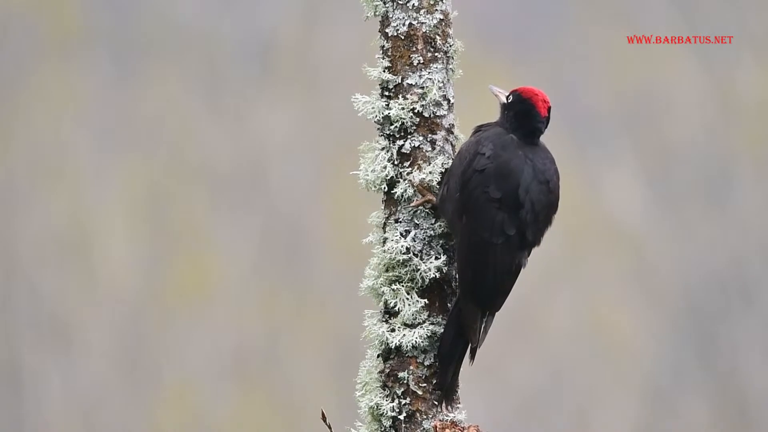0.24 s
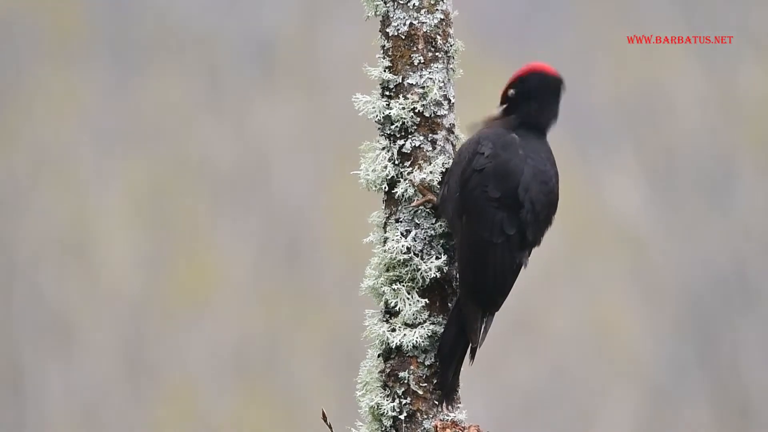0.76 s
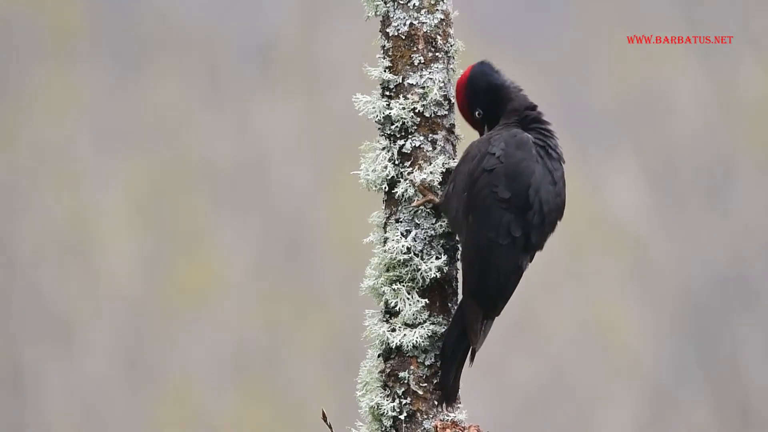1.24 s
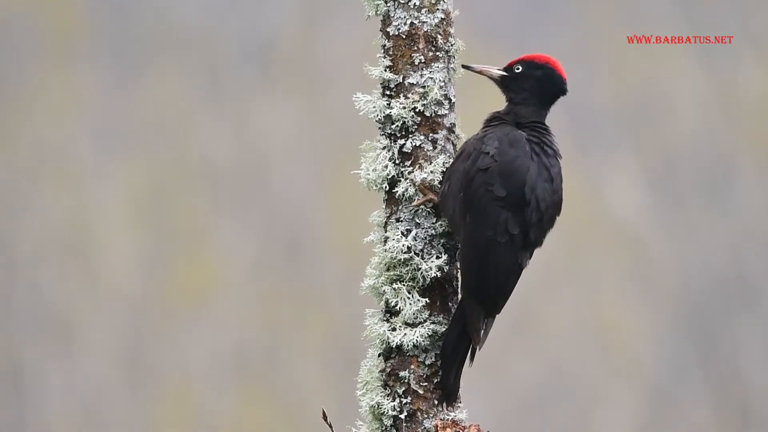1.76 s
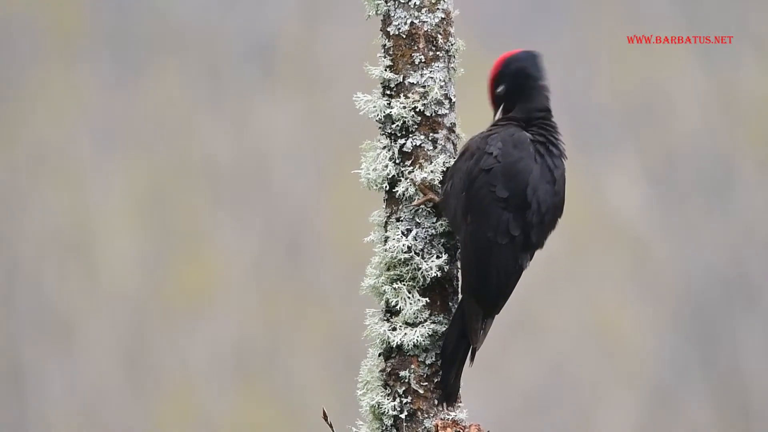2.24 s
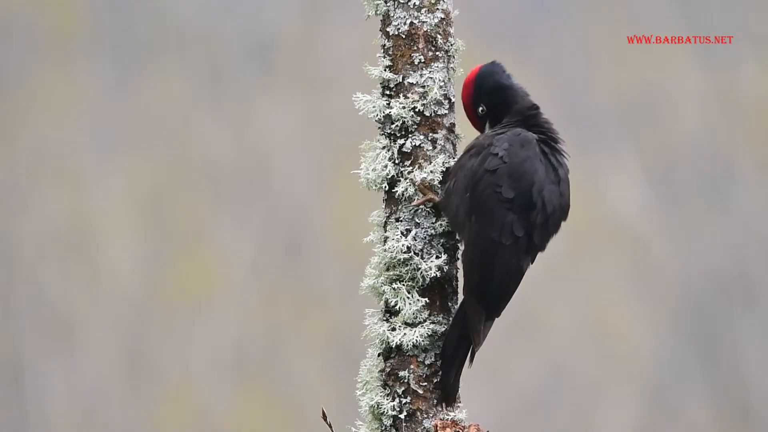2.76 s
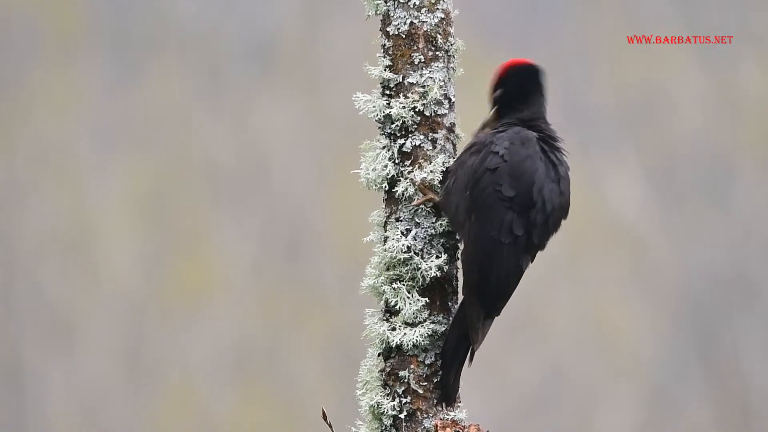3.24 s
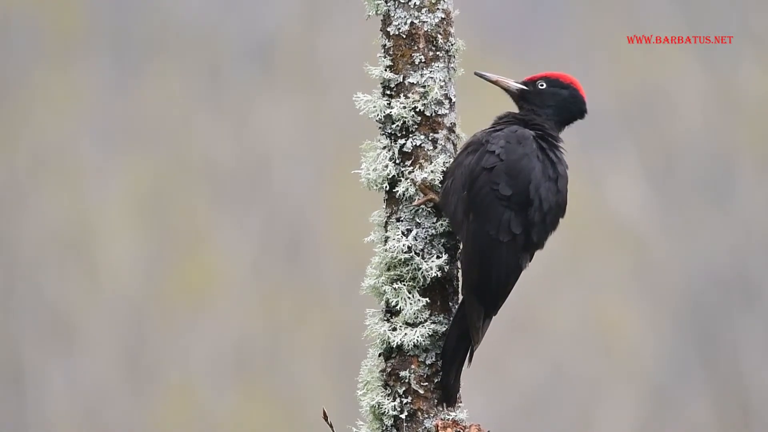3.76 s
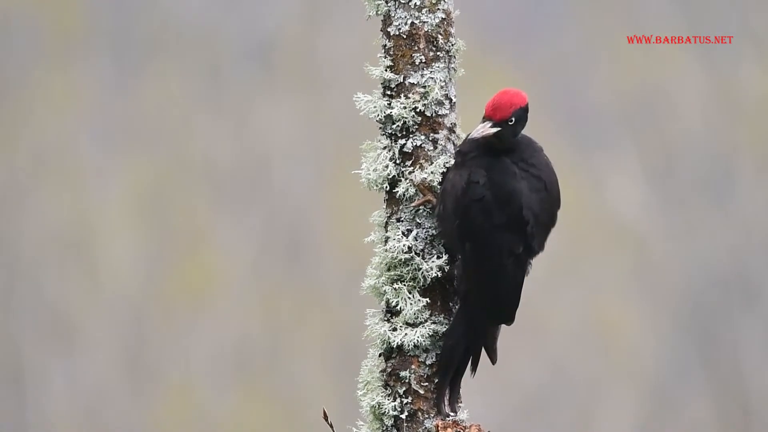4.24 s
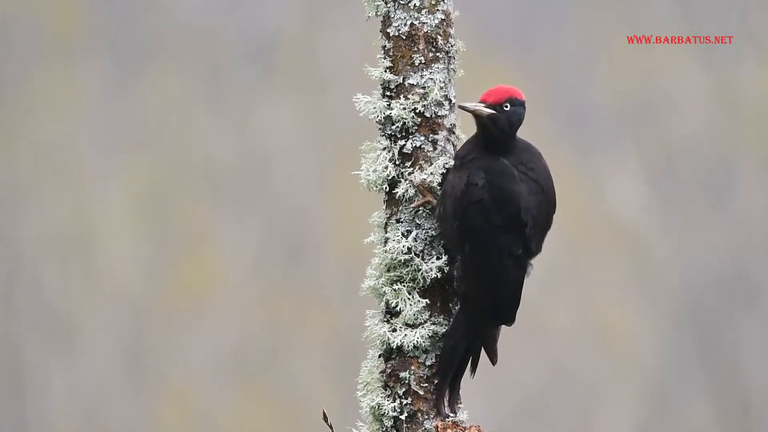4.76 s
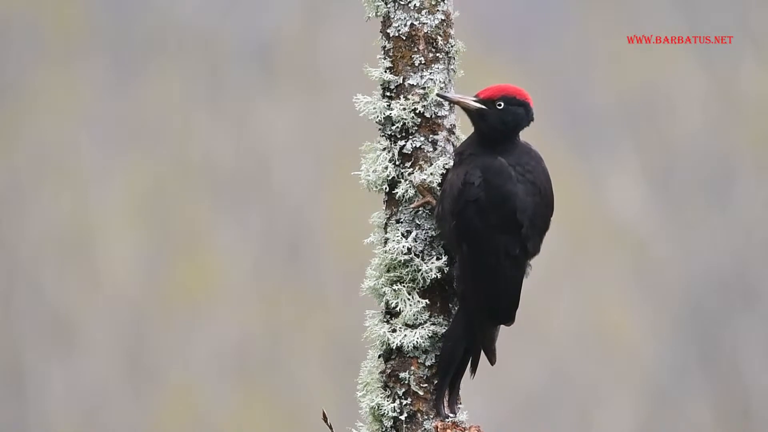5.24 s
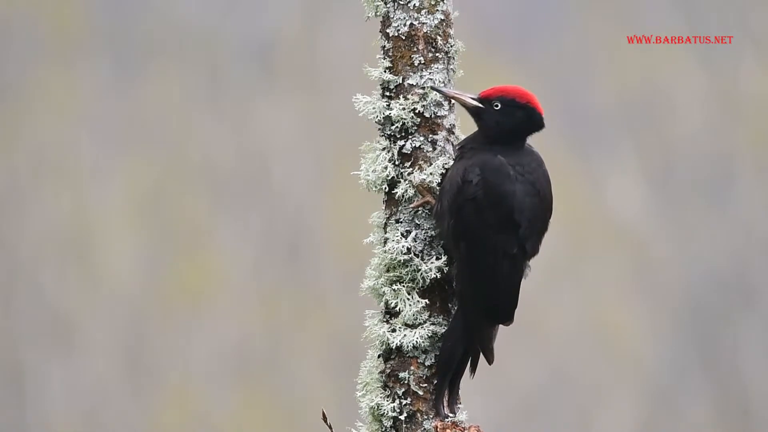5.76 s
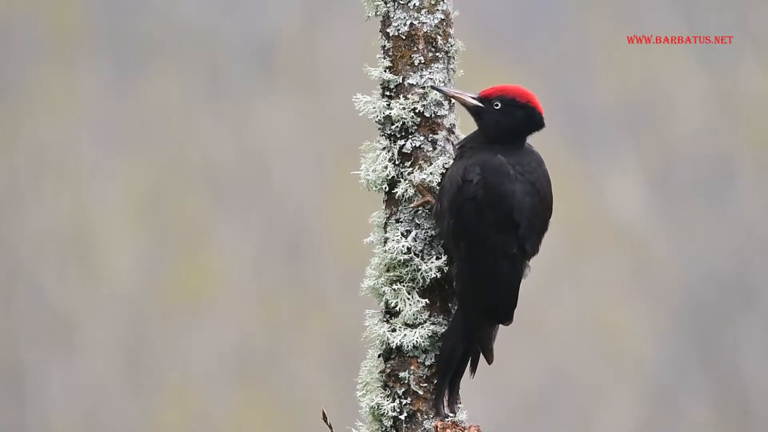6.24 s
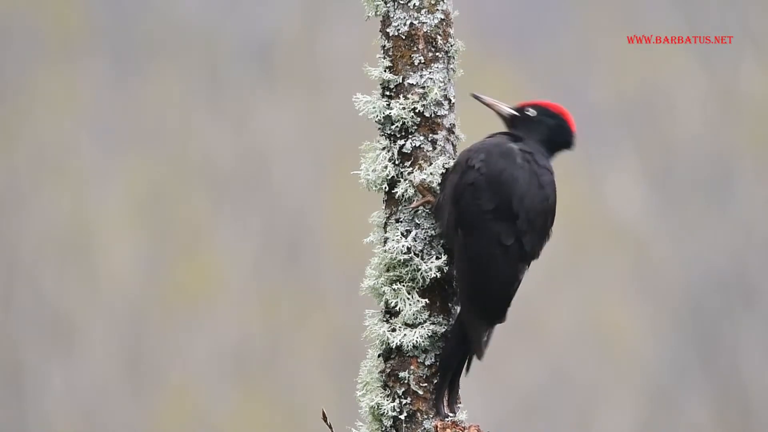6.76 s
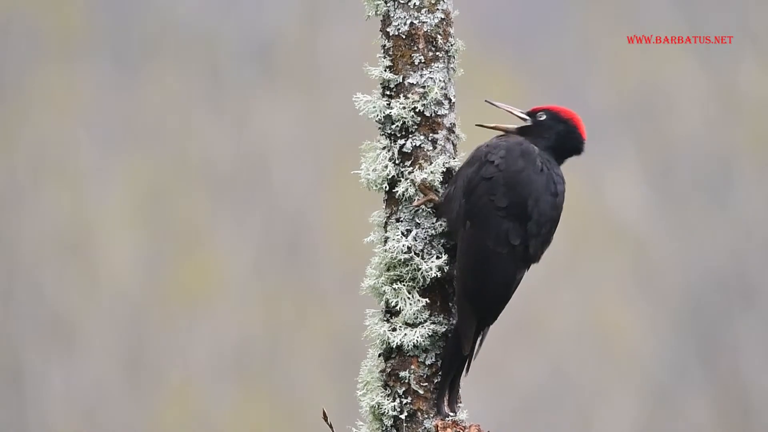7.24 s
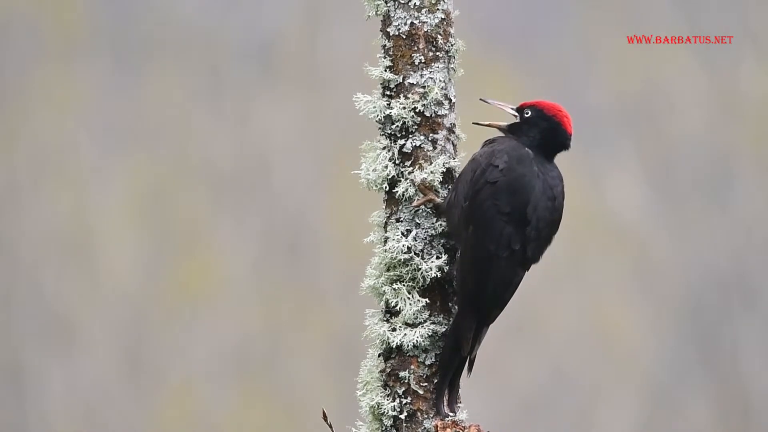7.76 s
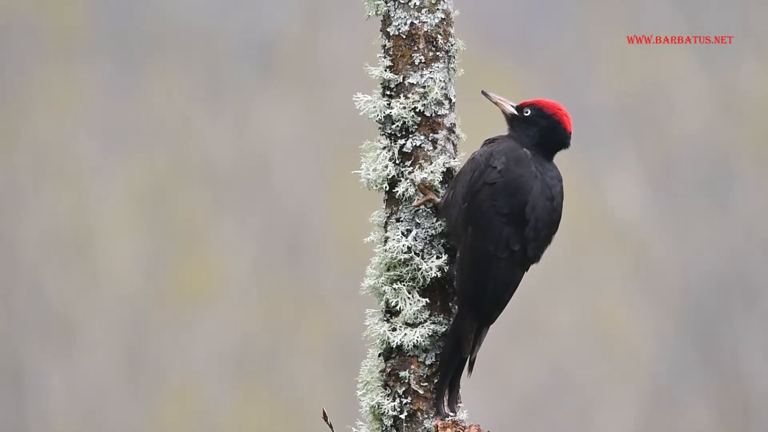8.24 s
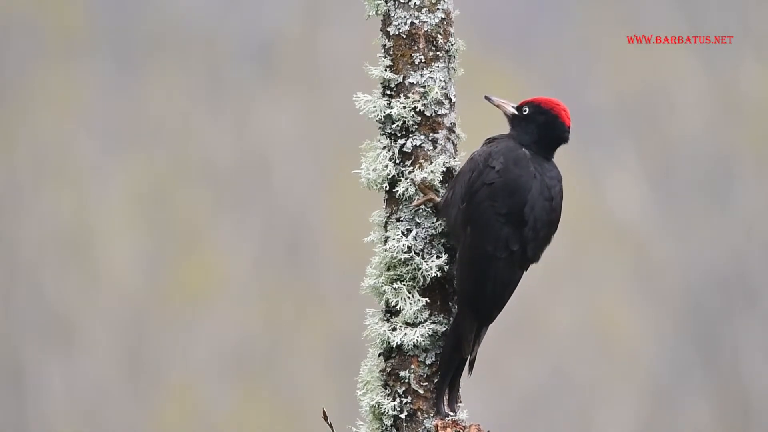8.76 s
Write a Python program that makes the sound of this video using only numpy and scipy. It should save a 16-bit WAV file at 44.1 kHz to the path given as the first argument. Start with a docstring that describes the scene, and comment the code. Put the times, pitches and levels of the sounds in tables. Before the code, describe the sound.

Over a faint, distant rush like wind or water, a woodpecker lets out one drawn-out whistling call that falls away and echoes among the trees. A short gap follows, then the same bird delivers nearly thirty loud, evenly spaced ringing notes, each sliding upward with a slight rasp. The microphone picks it up clearly, with forest echo trailing behind. A very faint, high, distant bird comes at the end.

```python
"""A mountain forest: a large woodpecker on a trunk gives one drawn-out falling call, then a long fast
series of ringing notes, each an upward slur that snaps onto a held pitch. The voice is a harmonic stack
with a faint rasp. Trees scatter a long echo with a late, dull tail, over a far rush of air or water; a
faint, high distant bird comes at the end. The recorder adds faint mains hum and hiss and bends a little
on loud notes."""
import sys
import numpy as np
from scipy import signal
from scipy.fft import rfft, irfft, next_fast_len
from scipy.io import wavfile
from scipy.ndimage import uniform_filter1d, map_coordinates

SR = 44100
rng = np.random.default_rng(int(sys.argv[2]) if len(sys.argv) > 2 else 0)


def int16_out(signal):
    """Quantize to a 16-bit WAV file."""
    q = np.round(np.clip(np.atleast_2d(signal).T, -1, 1) * 32767)
    wavfile.write(sys.argv[1], SR, q.astype(np.int16))


N = 396900


def amp(db):
    return 10 ** (np.asarray(db) / 20)


def unit_rms(x):
    return x / np.sqrt(np.mean(x ** 2) + 1e-20)


def log_interp(points, hz):
    """Interpolate (Hz, value) points on a log frequency axis."""
    point_hz, values = np.transpose(points)
    return np.interp(np.log(hz + 1), np.log(point_hz + 1), values)


def wobble(knots_per_s):
    """Smooth random curve."""
    knots = rng.standard_normal(int(N * knots_per_s / SR) + 4)
    return map_coordinates(knots, [np.arange(N) * knots_per_s / SR])


def filtered(x, response):
    """Zero-phase filter with gain response(hz)."""
    size = next_fast_len(N + SR // 2)
    return irfft(rfft(x, size) * response(np.fft.rfftfreq(size, 1 / SR)), size)[:N]


def noise(spectrum):
    """Unit-rms noise. Each spectrum row: frequency in Hz, relative density in dB."""
    return unit_rms(filtered(rng.standard_normal(N), lambda hz: amp(log_interp(spectrum, hz))))


def background():
    """Far rush of air or water, a faint high bird at the end; recorder hiss, rumble, hum and bumps."""
    # Each row: frequency in Hz, relative density in dB.
    rush_spectrum = [(400, -38), (700, -25), (850, -14), (1000, -4), (1500, -2), (1750, -5), (2100, 0),
                     (2600, -5), (3500, -15), (5200, -27), (7000, -38), (9000, -70)]
    hiss_spectrum = [(20, 4), (32, 4), (45, -2), (70, -10), (200, -20), (600, -25.5), (5000, -31),
                     (15000, -30)]
    bump_spectrum = [(20, -6), (60, 0), (130, -3), (250, -14), (500, -35), (1200, -80)]
    distant_bird_spectrum = [(2500, -40), (3600, -3), (4200, 0), (4800, -4), (6000, -40)]
    # Each row: frequency in Hz, rms level in dB.
    hum_lines = [(100, -85), (200, -98), (300, -97)]
    # Each row: start in seconds, level in dB before a 12 dB lift.
    bump_hits = [(1.45, -72), (1.535, -65), (3.56, -70), (3.98, -75), (4.72, -75), (4.89, -75)]
    # Each row: time in seconds, level in dB.
    distant_bird_levels = [(8.75, -95), (8.82, -76), (8.9, -73), (9.0, -75)]
    t = np.arange(N) / SR
    rush = amp(-62 + .5 * wobble(2)) * noise(rush_spectrum)
    hum = sum(amp(db + 3 + 2.5 * wobble(.8)) * np.sin(2 * np.pi * hz * t) for hz, db in hum_lines)
    bump_envelope = np.zeros(N)
    for start_s, db in bump_hits:
        age_s = np.maximum(t - start_s, 0)
        bump_envelope += amp(db + 12 - 60 * age_s / .2) * (1 - np.exp(-age_s / .01))
    bumps = noise(bump_spectrum) * bump_envelope
    distant_bird_db = np.interp(t, *np.transpose(distant_bird_levels)) + 3 * wobble(30)
    distant_bird = amp(distant_bird_db) * noise(distant_bird_spectrum)
    return distant_bird + rush + amp(-72) * noise(hiss_spectrum) + hum + bumps


def lingering_whistle():
    """Faint wavering tone at the start: a whistle's last echo."""
    # Each row: time in seconds, pitch in Hz, level in dB.
    contour = [(0, 1565, -70), (.25, 1570, -73), (.34, 1570, -90)]
    at_s, hz, db = np.transpose(contour)
    t = np.arange(N) / SR
    phase = 2 * np.pi * np.cumsum(np.interp(t, at_s, hz)) / SR
    return amp(np.interp(t, at_s, db) + 3 * wobble(25)) * np.sin(phase) * (t < at_s[-1])


def late_echo_tail(x, delay_s=.44, smear_s=.05, cutoff_hz=2000):
    """Late, dull, smeared tail of the forest echo."""
    t = np.arange(SR // 2) / SR
    smear = rng.standard_normal(len(t)) * np.exp(-.5 * ((t - 3 * smear_s) / smear_s) ** 2)
    impulse = np.pad(smear / np.linalg.norm(smear), (round((delay_s - 3 * smear_s) * SR), 0))
    echo = signal.fftconvolve(x, impulse)[:N]
    return amp(-31) * filtered(echo, lambda hz: 1 / (1 + (hz / cutoff_hz) ** 4))


def forest_echo(x, swell_s=.045, clump_db=3, beam_hz=3000):
    """Echoes off the ground and near trunks, then scatter that swells and dies, treble first."""
    # Each row: delay in seconds, gain in dB.
    near_paths = [(.006, -12), (.013, -25), (.022, -27)]
    # Each row: frequency in Hz, T60 in seconds.
    decay_times = [(900, .8), (1600, .95), (2600, .85), (3300, .75), (6000, .7)]
    # Each row: frequency in Hz, relative level in dB.
    scatter_spectrum = [(700, -30), (1000, -10), (1350, -3.5), (1550, 5), (1850, 5), (2200, 2), (2700, 3.5),
                        (3300, 0), (3700, 4.5), (4200, 5), (4800, 1.5), (5500, 7), (8000, -6)]
    # The head turns. Each row: time in seconds, treble sent to the trees over direct treble in dB.
    head_turns = [(1.9, -4.5), (3.4, 3.5), (5.5, 3), (6.0, 1.2), (8.4, 0)]
    hz, t, bins = signal.stft(rng.standard_normal(2 * SR), SR, nperseg=256)
    decay_db = 60 * t / log_interp(decay_times, hz)[:, None]
    envelope = amp(log_interp(scatter_spectrum, hz)[:, None] - decay_db) * (1 - np.exp(-t / swell_s))
    tail = signal.istft(bins * envelope, SR, nperseg=256)[1]
    tail *= amp(clump_db * wobble(40)[:len(tail)])  # trunks stand in clumps
    near = sum(amp(db) * np.pad(x, (round(delay_s * SR), 0))[:N] for delay_s, db in near_paths)
    beamed = filtered(x, lambda hz: 1 / (1 + (beam_hz / (hz + 1)) ** 6))
    turn_gain = amp(np.interp(np.arange(N) / SR, *np.transpose(head_turns)))
    sent = x + beamed * (turn_gain - 1)
    return near + amp(-21.6) * signal.fftconvolve(sent, tail / np.linalg.norm(tail))[:N]


def sing(track, contour):
    """Add one call. Each row: time in seconds, pitch in Hz, dB of harmonics 1, 2, 3, 4 and 5-9."""
    # Relative levels of harmonics 5 to 9 in dB.
    upper_mix_db = [0, -5, -15, -17, -22]
    at_s, hz, db1, db2, db3, db4, upper_db = np.transpose(contour)
    t = at_s[0] + np.arange(SR) / SR
    smooth = lambda values: uniform_filter1d(np.interp(t, at_s, values), size=66, mode="nearest")
    pitch_hz = smooth(hz) * (1 + .004 * wobble(120)[:len(t)])
    phase = 2 * np.pi * np.cumsum(pitch_hz) / SR
    rough_db3 = db3 + 1.5 * rng.standard_normal(len(at_s))
    rough_db4 = db4 + 2.5 * rng.standard_normal(len(at_s))
    lower = sum(amp(smooth(db)) * np.sin(k * phase)
                for k, db in enumerate([db1, db2, rough_db3, rough_db4], 1))
    flutter_db = 3 * unit_rms(uniform_filter1d(rng.standard_normal(len(t)), size=40))
    upper = sum(amp(db) * np.sin(k * phase) for k, db in enumerate(upper_mix_db, 5))
    upper *= amp(smooth(upper_db) + flutter_db)
    rasp = amp(smooth(db4) - 7.5) * signal.lfilter([1], [1, -.78], rng.standard_normal(len(t)))
    track[round(at_s[0] * SR):][:len(t)] += (lower + upper + rasp) * (t < at_s[-1])


def yelp(start_s, length_s, start_hz, end_hz, db, rise_s=.003, fall_s=.004):
    """Contour of a short cry led by the octave: drops onto its pitch, holds, dies."""
    # Relative levels of harmonics 1, 2, 3, 4 and 5-9 in dB.
    mix_db = [0, 10, -17, -36, -30]
    end_s = start_s + length_s
    shape = [(start_s - rise_s, 1.11 * start_hz, -42), (start_s, start_hz, 0),
             (start_s + .65 * length_s, .99 * start_hz, 0), (end_s, end_hz, -1.5),
             (end_s + fall_s, end_hz, -22), (end_s + 2 * fall_s, end_hz, -50)]
    return [(at_s, hz, *(db + gain_db + np.array(mix_db))) for at_s, hz, gain_db in shape]


def ringing_note(start_s, slur_s, hold_s, held_hz, early1, late1, hold2, hold3):
    """Contour of an upward slur snapping onto a held pitch. Numbered names: that harmonic's dB."""
    # Each row: time in seconds, rise of the hold in Hz/s, slur levels of harmonics 1, 2, 3 in dB.
    series_drift = [(3.65, 1800, -24.5, -35, -55), (4.5, 1750, -22.5, -35, -53),
                    (4.75, 1150, -22, -31.5, -46.5), (5.5, 1050, -24.3, -28.5, -45),
                    (6.05, 1150, -22.7, -22.3, -39.5), (6.7, 1150, -23, -27, -39.5),
                    (7.1, 800, -20.3, -25.5, -46.5), (7.6, 700, -20.2, -24.6, -42.5),
                    (8.35, 400, -21, -24, -42)]
    at_s, *columns = np.transpose(series_drift)
    rise_hz_per_s, slur1, slur2, slur3 = [np.interp(start_s, at_s, column) for column in columns]
    crest_hz = 1465 + .3 * (held_hz - 1800)  # the slur's top follows the held pitch
    knee_hz = crest_hz - 4700 * slur_s  # a longer slur starts lower
    end_hz = held_hz + rise_hz_per_s * hold_s
    snap_s = start_s + slur_s
    stop_s = snap_s + hold_s
    upper_db = .5 * early1 + .75 * slur2 - 35.7  # louder notes are brighter
    # A low start or a strong octave thins the fundamental.
    onset1 = slur1 - .055 * (1310 - knee_hz) - .45 * (slur2 + 29)
    return [
        # Faint lead-in, then the slur; the octave speaks first.
        (start_s - .014, .7 * knee_hz, onset1 - 48, slur2 - 45, slur3 - 45, upper_db - 40, upper_db - 45),
        (start_s - .002, .77 * knee_hz, onset1 - 31, slur2 - 14, slur3 - 18,
         upper_db - 15, upper_db - 25),
        (start_s + .001, .83 * knee_hz, onset1 - 24, slur2 + .7, slur3 - 11, slur3 - 20, slur3 - 31),
        (start_s + .004, .975 * knee_hz, onset1 - 9.5, slur2 + 1.5, slur3 - 5, slur3 - 23, slur3 - 30),
        (start_s + .009, knee_hz, onset1 - 6, slur2, slur3 - 1, slur3 - 28, slur3 - 31),
        (start_s + .5 * slur_s + .001, .5 * (crest_hz + knee_hz), slur1 - 4, slur2, slur3 + 2.2,
         slur3 - 29, slur3 - 29),
        (snap_s - .007, crest_hz, slur1 + 1.2, slur2 - 3, slur3 - 5, slur3 - 23, slur3 - 28),
        # Snap and hold.
        (snap_s - .001, 1.065 * crest_hz, early1 - 1.2, slur2 - 9, slur3 - 16,
         upper_db - 3, upper_db - 15),
        (snap_s + .003, .99 * held_hz, early1 + 1.2, hold2 - 1.2, hold3, upper_db + 1.2, upper_db - 15),
        (snap_s + .45 * hold_s, .6 * held_hz + .4 * end_hz, .6 * early1 + .4 * late1,
         hold2 + 1.2, hold3 + 1.2, upper_db + 3, upper_db - 12),
        (stop_s - .010, end_hz, late1, hold2 - 1.2, hold3 - 1.2, upper_db - 2.2, upper_db - 14),
        # The note flicks down and dies, then a brief echo-like blip.
        (stop_s - .006, .97 * end_hz, late1 - 3, hold2 - 4, hold3 - 6, upper_db - 11, upper_db - 21),
        (stop_s - .003, .94 * end_hz, late1 - 11, hold2 - 9, hold3 - 15, upper_db - 21, upper_db - 26),
        (stop_s, .9 * end_hz, late1 - 5, hold2 - 12, hold3 - 21, upper_db - 24, upper_db - 28),
        (stop_s + .004, .82 * end_hz, late1 - 45, hold2 - 45, hold3 - 45, upper_db - 50, upper_db - 60)]


def woodpecker():
    """Two yelps, a held whistle that falls, a soft slow opener and the series, on unsteady breath."""
    # Each row: start and length in seconds, start and end pitch in Hz, fundamental in dB.
    yelps = [(1.435, .006, 1450, 1450, -32), (1.458, .018, 1690, 1600, -27.8)]
    # Each row: time in seconds, pitch in Hz, harmonics 1, 2, 3 in dB.
    whistle = [(1.472, 1600, -75, -75, -90), (1.479, 1565, -36, -38, -55), (1.495, 1520, -41, -52, -58),
               (1.55, 1548, -39, -58, -61), (1.73, 1550, -37, -58, -57), (1.85, 1535, -41, -51, -54),
               (1.92, 1510, -40, -41, -52), (1.948, 1420, -33, -28, -48), (1.955, 1300, -41, -32, -58),
               (1.961, 1080, -60, -35, -47), (1.966, 880, -65, -43, -39), (1.969, 800, -90, -90, -90)]
    # Each row: time in seconds, pitch in Hz, harmonics 1, 2 in dB.
    opener = [(3.385, 880, -78, -68), (3.40, 975, -57, -51), (3.41, 1155, -53, -64), (3.42, 1395, -36, -54),
              (3.44, 1525, -28, -45), (3.47, 1640, -22.5, -35), (3.512, 1722, -23, -36),
              (3.522, 1660, -40, -60), (3.526, 1620, -90, -100)]
    # Each row: start, slur and hold in seconds, held pitch in Hz, then hold levels in dB of the
    # fundamental early and late and of harmonics 2, 3.
    notes = [(3.646, .042, .048, 1680, -23.4, -17.9, -35, -66),
             (3.854, .037, .043, 1690, -23.2, -16.7, -36, -66),
             (4.048, .033, .043, 1708, -19.9, -18.5, -37, -66.5),
             (4.227, .034, .044, 1742, -18, -25.2, -39, -63),
             (4.405, .03, .042, 1755, -20.4, -27.6, -41, -65),
             (4.572, .034, .036, 1810, -21.1, -20, -38, -59),
             (4.739, .031, .039, 1810, -21.5, -20.4, -35, -57),
             (4.906, .032, .041, 1822, -21.5, -23.5, -36, -59),
             (5.073, .03, .042, 1812, -21.5, -23.5, -36, -61),
             (5.24, .027, .042, 1820, -21.4, -24.5, -36, -60),
             (5.406, .028, .04, 1838, -19.9, -21.3, -36, -61),
             (5.569, .032, .034, 1822, -19.1, -17.9, -34.5, -56),
             (5.733, .031, .036, 1828, -18.8, -17.8, -33, -53),
             (5.896, .033, .032, 1862, -15.5, -12.5, -37, -44.5),
             (6.056, .033, .038, 1840, -16.6, -14.3, -32, -47.5),
             (6.221, .033, .035, 1855, -15.7, -13, -33, -44.5),
             (6.384, .034, .037, 1805, -19.1, -17, -30, -54),
             (6.551, .032, .038, 1800, -19.5, -17.8, -29, -57),
             (6.722, .03, .039, 1800, -19.4, -22.7, -30, -54),
             (6.889, .037, .03, 1845, -15.9, -16.5, -40, -48.5),
             (7.058, .035, .036, 1782, -16.8, -20.1, -31, -63),
             (7.235, .037, .034, 1772, -16, -18.7, -32, -61),
             (7.41, .039, .035, 1782, -17.2, -18.9, -31, -58.5),
             (7.587, .038, .033, 1800, -17.4, -22.2, -29, -53.5),
             (7.768, .041, .033, 1795, -17.7, -20.3, -32.5, -57.5),
             (7.951, .041, .034, 1810, -17.7, -18.8, -34, -62.5),
             (8.139, .042, .033, 1775, -15.8, -20.1, -31, -58),
             (8.346, .051, .025, 1770, -15.4, -15.7, -33, -60)]
    calls = [yelp(*row) for row in yelps]
    # Higher harmonics follow the last one listed.
    calls.append([(*row, row[-1] - 27, row[-1] - 43) for row in whistle])
    calls.append([(*row, row[-1] - 26, row[-1] - 36, row[-1] - 52) for row in opener])
    calls += [ringing_note(*row) for row in notes]
    voice = np.zeros(N + SR)
    for contour in calls:
        sing(voice, contour)
    return voice[:N] * amp(.8 * wobble(150))


def scene():
    """Bird, echoes and background, mono."""
    bird = woodpecker()
    return (bird + forest_echo(bird) + late_echo_tail(bird) + lingering_whistle() + background())[None]


def record(dry):
    """A slightly lopsided preamplifier turns loud notes into faint low thuds; then a band limit."""
    thuds = filtered(dry[0] ** 2, lambda hz: (hz > 15) / (1 + (hz / 500) ** 2))
    return filtered(dry[0] + .1 * thuds, lambda hz: hz < 15130)[None]


dry = scene()
out = record(dry)
int16_out(out)
```